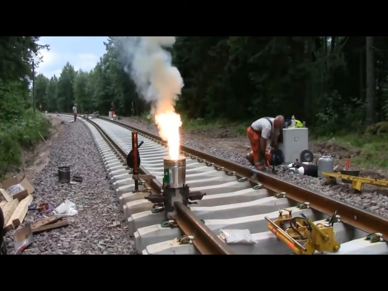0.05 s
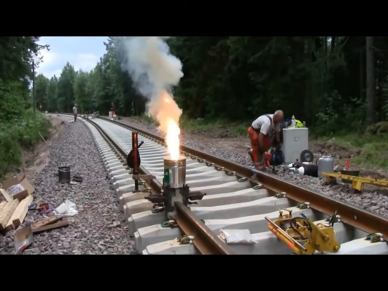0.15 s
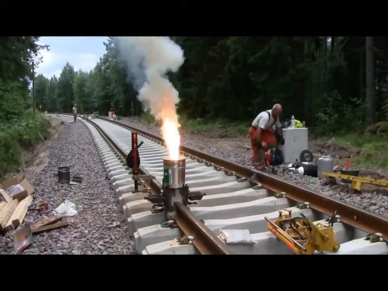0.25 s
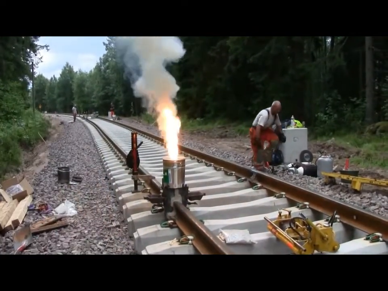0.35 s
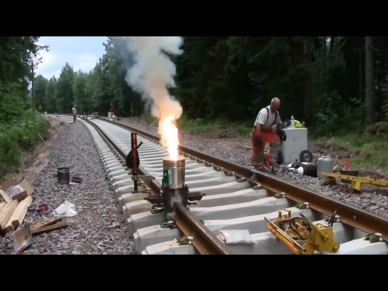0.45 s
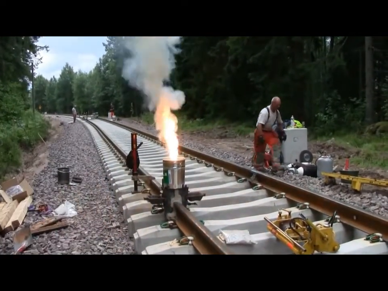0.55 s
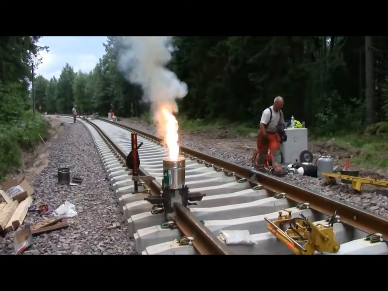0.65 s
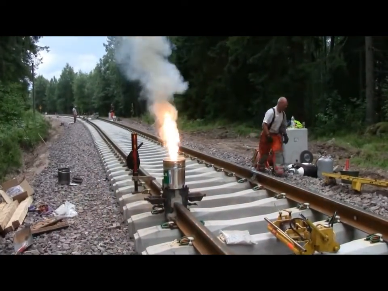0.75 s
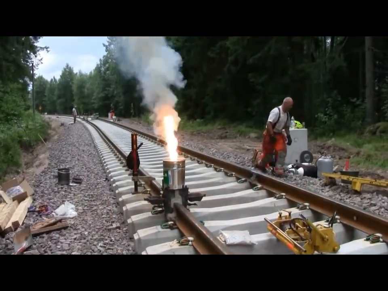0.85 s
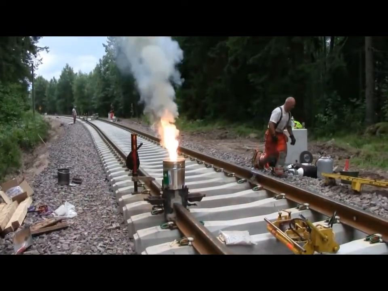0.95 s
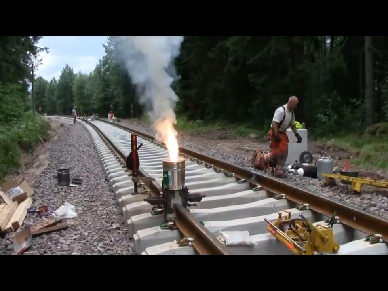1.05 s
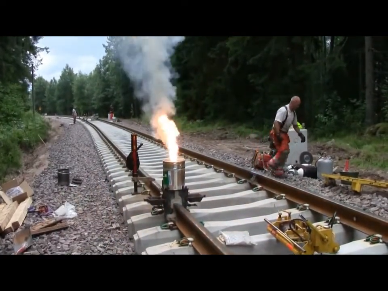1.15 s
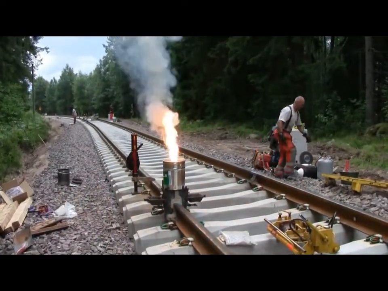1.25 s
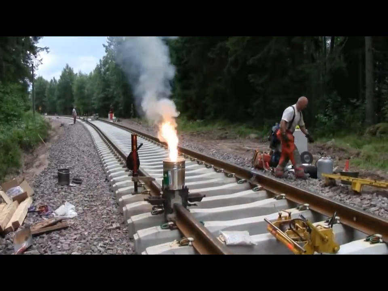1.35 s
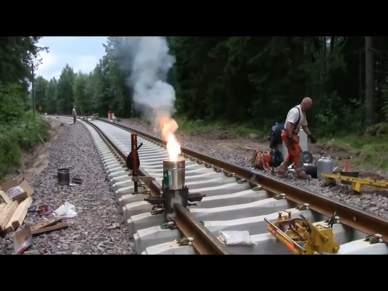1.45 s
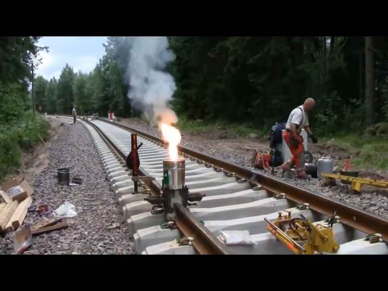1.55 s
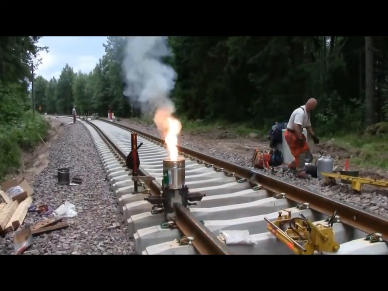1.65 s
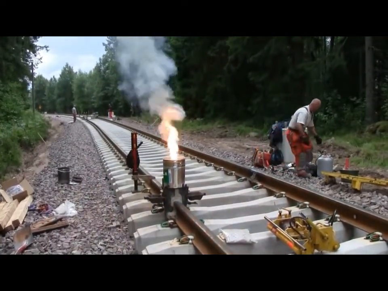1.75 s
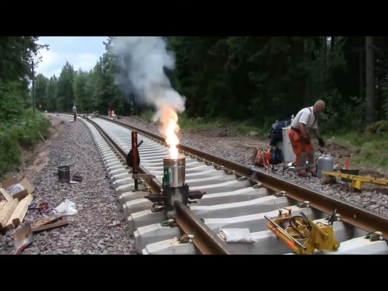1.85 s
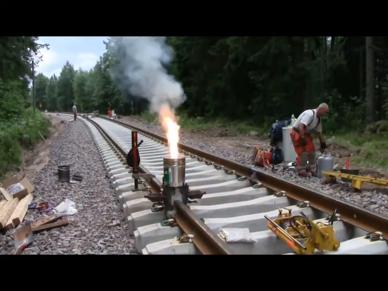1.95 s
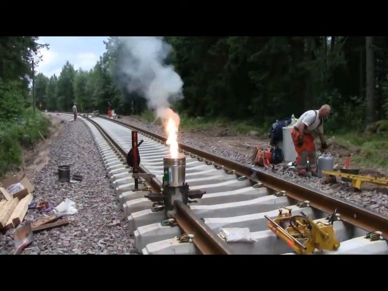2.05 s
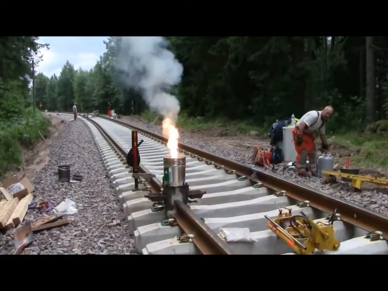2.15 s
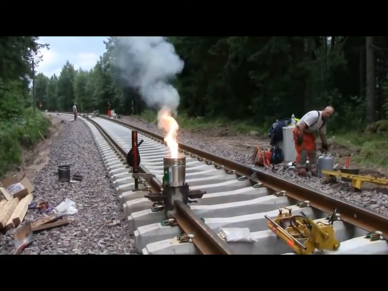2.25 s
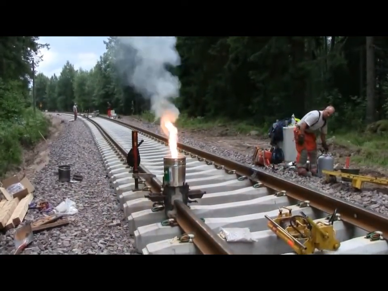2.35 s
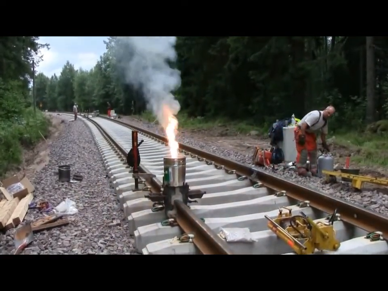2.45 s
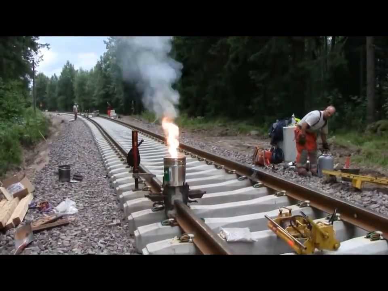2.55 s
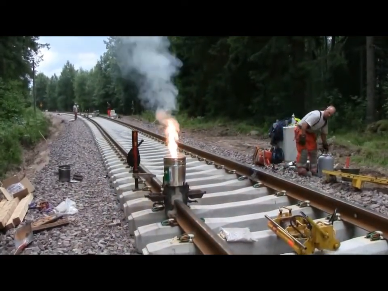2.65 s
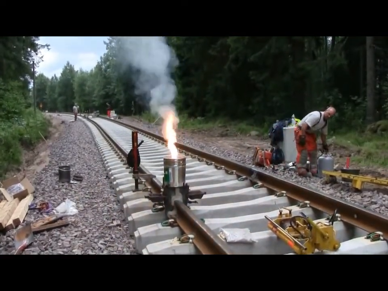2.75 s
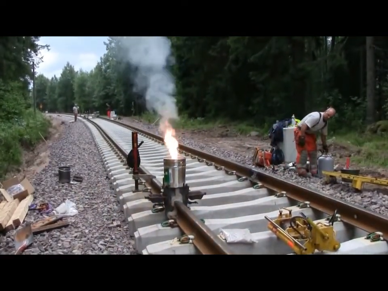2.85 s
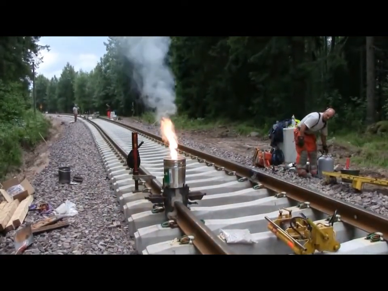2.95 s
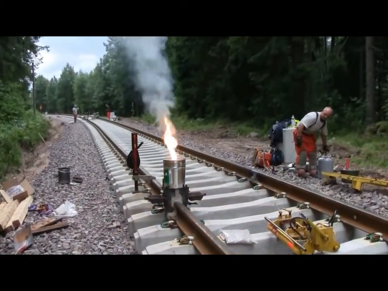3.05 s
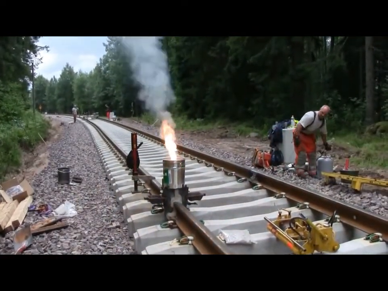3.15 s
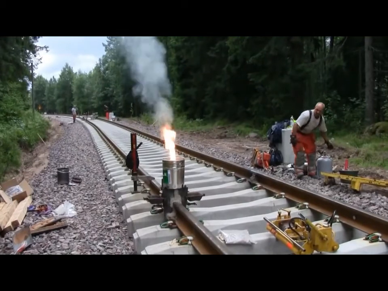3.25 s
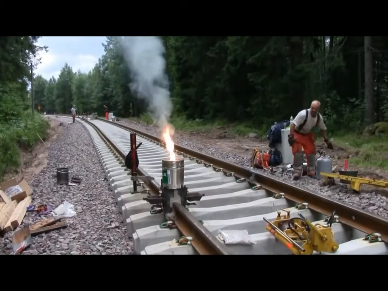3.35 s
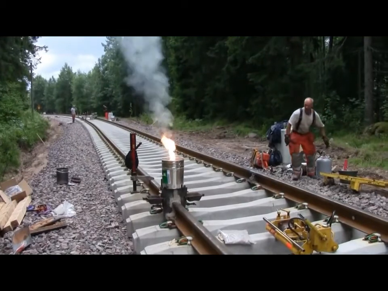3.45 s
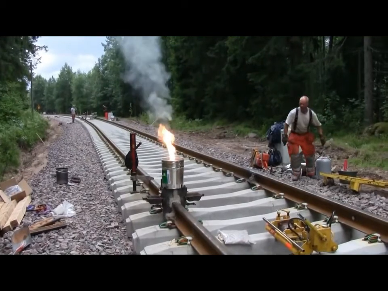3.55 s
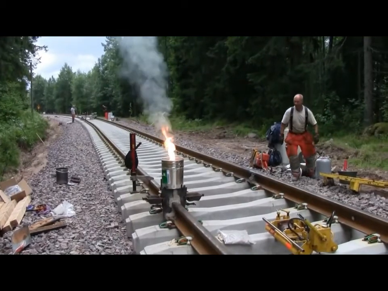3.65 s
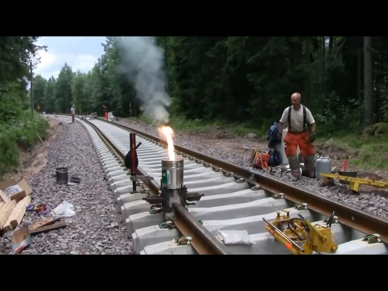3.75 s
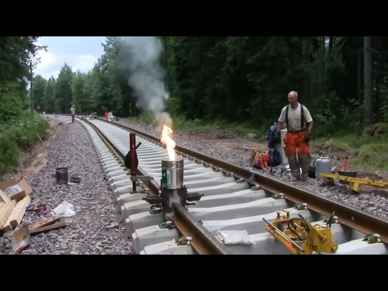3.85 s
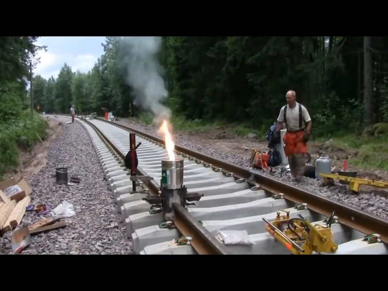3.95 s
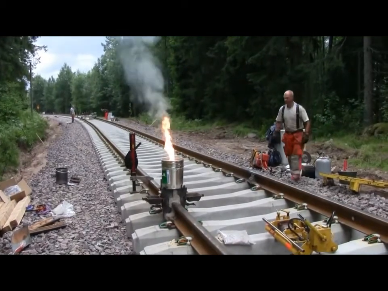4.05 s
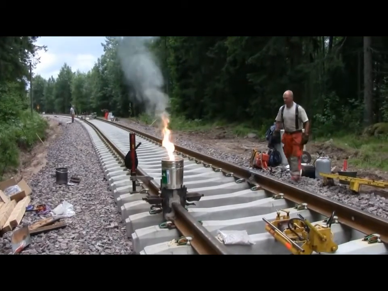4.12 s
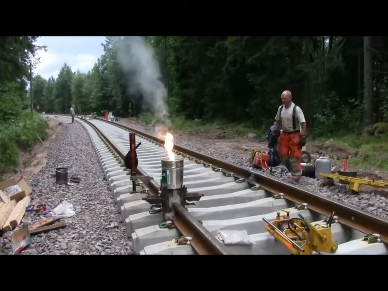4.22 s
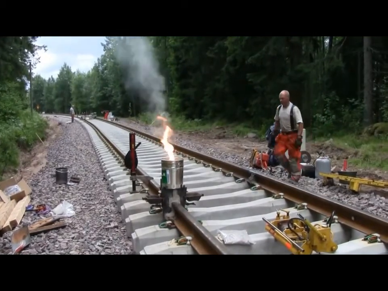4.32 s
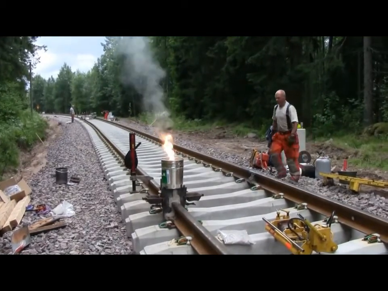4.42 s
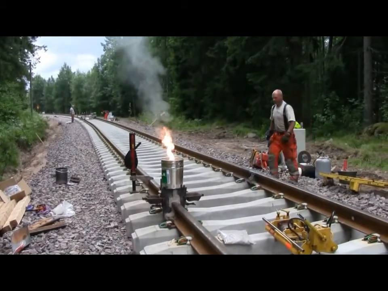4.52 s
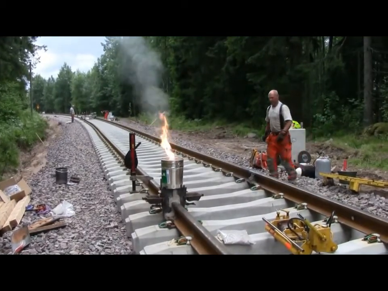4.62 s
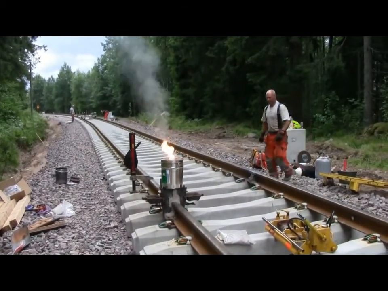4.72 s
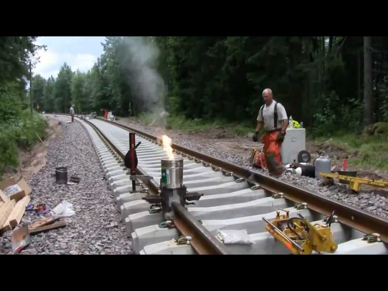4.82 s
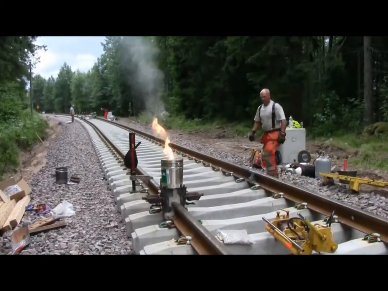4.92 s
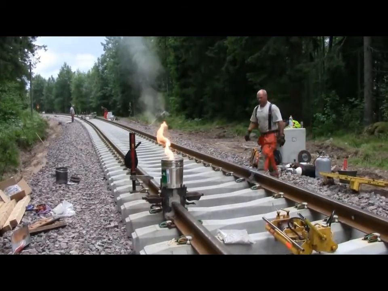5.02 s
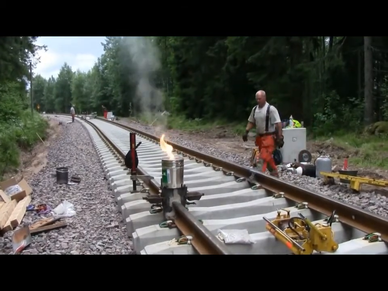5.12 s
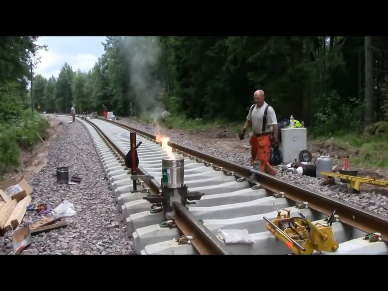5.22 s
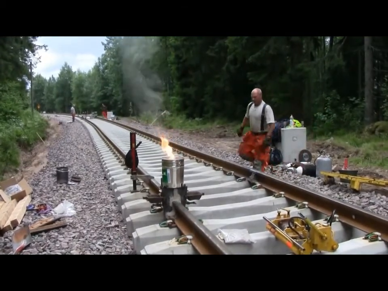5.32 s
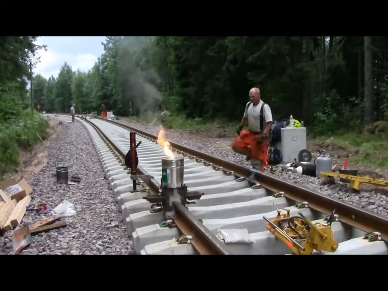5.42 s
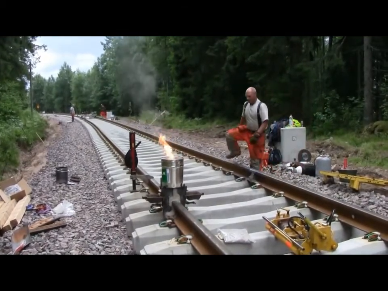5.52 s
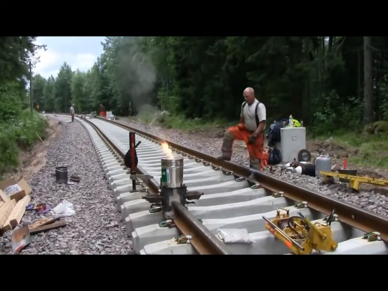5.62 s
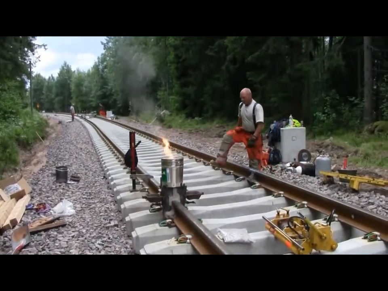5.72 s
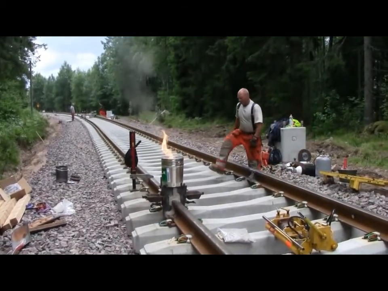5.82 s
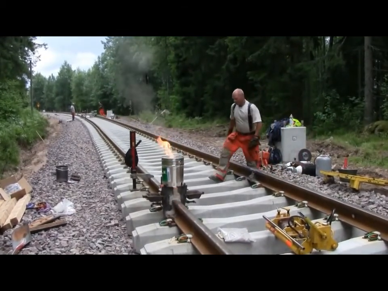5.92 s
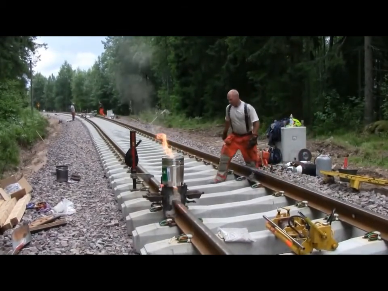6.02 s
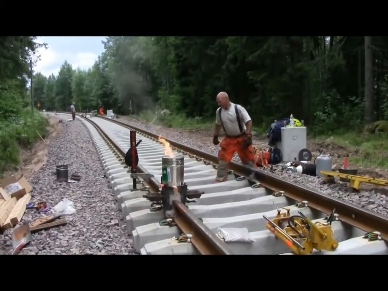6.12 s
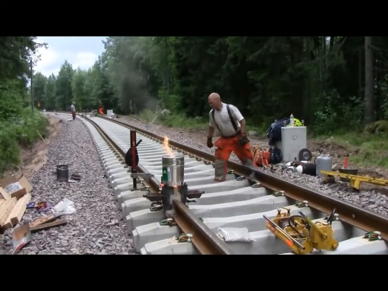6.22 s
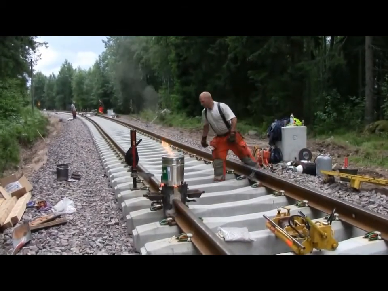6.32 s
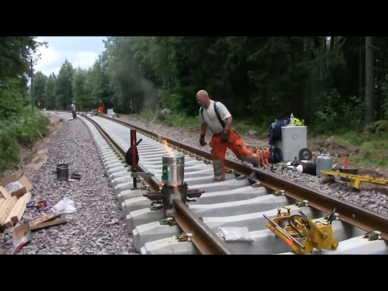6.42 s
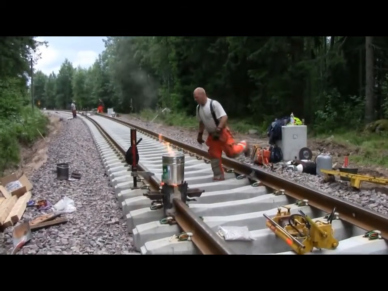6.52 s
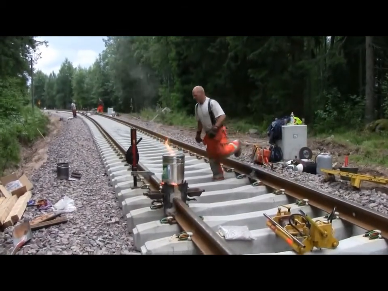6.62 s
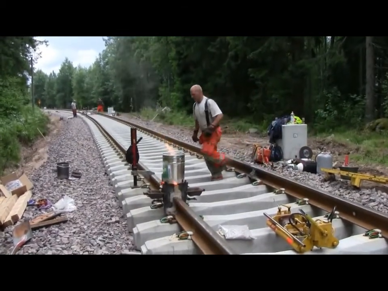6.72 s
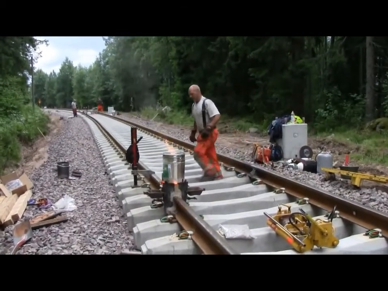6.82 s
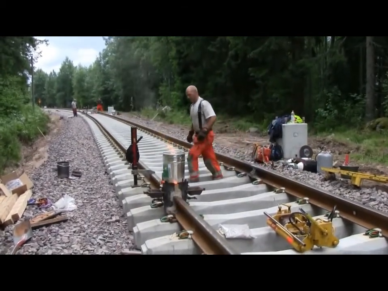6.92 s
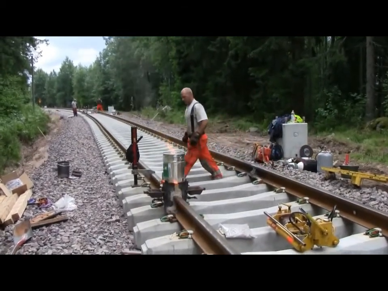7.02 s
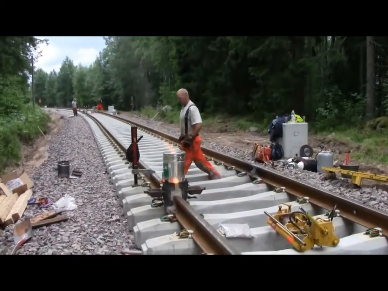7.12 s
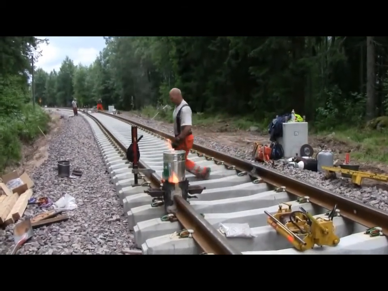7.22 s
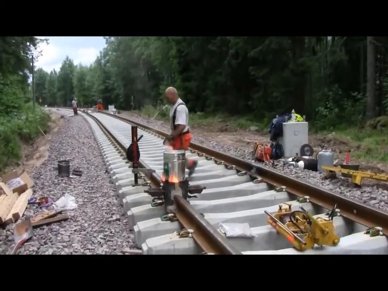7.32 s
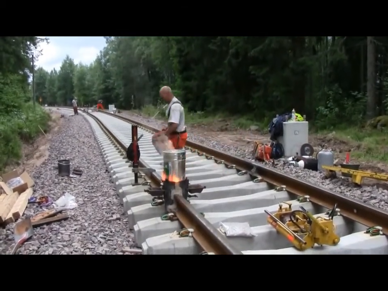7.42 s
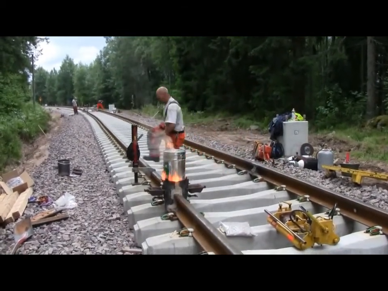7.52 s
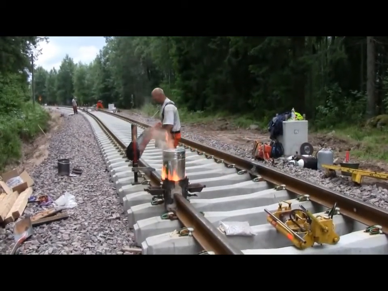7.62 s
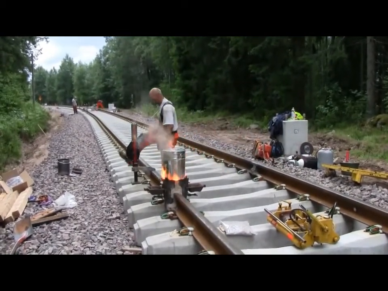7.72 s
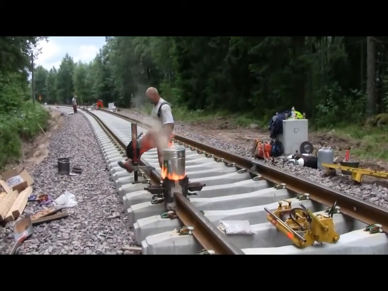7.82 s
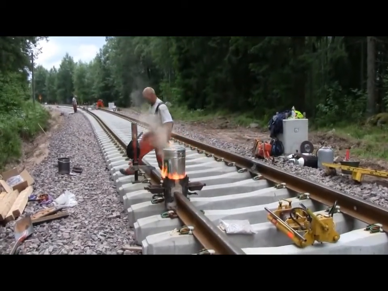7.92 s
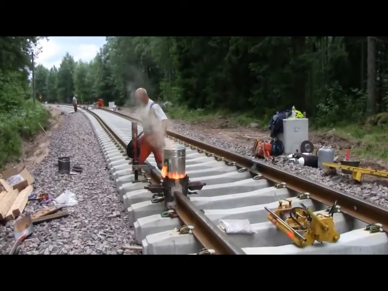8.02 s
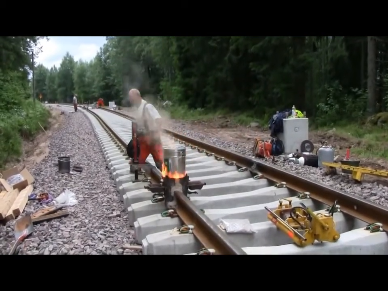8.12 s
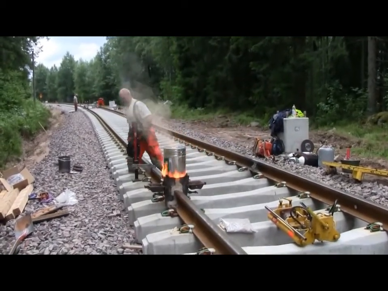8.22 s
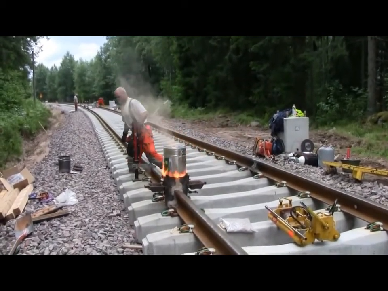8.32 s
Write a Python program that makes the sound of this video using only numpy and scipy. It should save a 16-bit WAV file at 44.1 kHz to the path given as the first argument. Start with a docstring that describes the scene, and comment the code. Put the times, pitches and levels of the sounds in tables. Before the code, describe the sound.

Outdoors among trees, a thermite crucible burns on a railway track, heard in fairly close stereo with a faint woodland echo. From 0 to 1 s it is loudest: hard slag cracks, a rough burst of hissing gas, bright spitting droplets and fizzing sparks over a hollow boom and low flame rumble. Another tight cluster of gas spurts and snaps comes around 0.8-0.9 s. From 1.1 to 3 s, rapid bubble bursts thud irregularly inside the pot, with crisp ticks and tiny metallic pings. A strong crack sounds near 3.3 s, others around 4.1-4.9 s, while the boiling weakens and the thuds deepen. After 5.3 s it is nearly spent: soft boots on gravel and sleepers, a crack near 5.8 s, sparse droplet spits and a dull knock at 7.1 s. From about 7.5 s, steel rushes softly and hollowly into the mould, gulping air at 7.6 and 8.2 s, with a last snap near 8.3 s.

```python
"""Slag cracks, gas spurts and spitting droplets over a booming pot: thermite burns on a track in a forest.
Gas bubbles drive a hollow boom, a flame rumble with fizzing sparks and a hissing leak, all by coloured noise.
Slag and droplets are ringing noise bursts; beads ping as decaying sines. The trees add a faint echo.
The boiling dies away, boots cross the track, and steel runs into the mould with a soft hollow rush."""
import sys
import numpy as np
from scipy import signal
from scipy.fft import rfft, irfft, next_fast_len
from scipy.io import wavfile
from scipy.ndimage import uniform_filter1d

SR = 44100
rng = np.random.default_rng(int(sys.argv[2]) if len(sys.argv) > 2 else 0)


def store_pcm(level_fs):
    """Save levels as 16-bit WAV."""
    pcm = np.round(np.clip(level_fs, -1, 1) * 32767).astype(np.int16)
    wavfile.write(sys.argv[1], SR, np.atleast_2d(pcm).T)


N = 369116
TIME = np.arange(N) / SR

# "nominal": trimmed or scaled where used
# vigour of the reaction, ebbing as the charge is used up: (time [s], level [dB])
VIGOUR_DB = [(0, -33.5), (1.0, -34), (1.6, -41), (2.6, -42.5), (3.2, -45.5), (4.6, -47.5), (5.3, -54.5),
             (6.1, -58), (8.37, -71)]
# big gas bubbles bursting: (time [s], nominal level [dB], nominal upper band re boom [dB], surge hold [s])
BUBBLE_BURSTS = [(0.318, -28.5, -7, 0.073), (0.436, -34, -22, 0.044), (1.103, -26, 0, .03),
                 (1.193, -25.5, -12, .03), (1.3, -26.5, -16, 0.037), (1.378, -22.5, -32, 0.14),
                 (1.484, -23, -12.5, 0.037), (1.639, -25, -13, 0.03), (1.738, -28.5, -11, 0.074),
                 (1.846, -25.5, -18, 0.071), (1.909, -23, -4.5, 0.068), (2.0, -26, -17, .07),
                 (2.106, -26.5, -26, 0.056), (2.199, -27.5, -14, .05), (2.298, -29, -17, 0.059),
                 (2.382, -29, -24, 0.041), (2.531, -36, -3.5, 0.025), (2.628, -31.5, -18, 0.14),
                 (2.75, -23.5, -12, 0.041), (2.838, -27.5, -24, 0.065), (2.884, -21, -8.5, 0.0063),
                 (2.939, -40, -20, 0.013), (3.045, -27, -11.5, 0.018), (3.181, -27.5, -12, 0.046),
                 (3.344, -31, -18, 0.061), (3.465, -32, -37, 0.02), (3.529, -27.5, -7.5, 0.06),
                 (3.619, -33, -18, 0.022), (3.754, -38, -19, 0.12), (3.916, -28, -11, 0.011),
                 (4.022, -28.5, -6.5, 0.017), (4.096, -33.5, -19, 0.028), (4.222, -26, -19, 0.0086),
                 (4.378, -30, -20, 0.025), (4.486, -29, -11, 0.017), (4.556, -35, -14, .05),
                 (4.647, -30.5, -38, 0.036), (4.727, -28, -17.5, 0.022), (4.805, -31.5, -24, 0.012),
                 (4.968, -33, -52, 0.037), (5.072, -36.5, -19, .055), (5.145, -33.5, -28, 0.0067),
                 (5.202, -34.5, -32, 0.038), (5.379, -29.5, -16, 0.0091), (5.453, -37.5, -8, 0.023),
                 (5.506, -37, -22, 0.021), (5.653, -38.5, -35, 0.036), (5.856, -34.5, -20, 0.03),
                 (5.901, -32, -13, 0.039), (6.042, -33.5, -45, 0.016), (6.174, -37.5, -24, 0.04),
                 (6.381, -39, -17, .015), (6.626, -35.5, -6.5, .02)]
# fine sparks: (time [s], nominal level [dB])
SPARK_DB = [(0.0, -42), (0.58, -53.5), (1.0, -50.5), (1.17, -58.5), (1.84, -55.5), (2.17, -55.5),
            (3.31, -60), (3.47, -51), (3.78, -56), (4.41, -51), (5.13, -63.5), (6.13, -55), (6.81, -61.5),
            (7.37, -57), (8.04, -61), (8.37, -54)]
# spurts of gas from the lid: (peak time [s], nominal level [dB], half length [s])
GAS_SPURTS = [(0.04, -26.5, 0.024), (0.045, -38.5, 0.22), (0.065, -32, 0.017), (0.768, -36.5, 0.015),
              (0.817, -25, 0.012), (0.842, -23, 0.021), (0.886, -29, 0.023), (.93, -52, 0.16),
              (1.089, -38.5, 0.01), (1.152, -33.5, 0.0037), (1.174, -36, 0.015), (1.224, -34.5, 0.0023),
              (1.369, -33, 0.0093), (1.409, -37, 0.024), (1.462, -43, 0.011), (1.558, -49.5, 0.054),
              (1.735, -47.5, 0.029), (1.899, -52.5, 0.006), (2.003, -59.5, 0.015), (2.536, -43.5, 0.0032),
              (3.206, -46.5, 0.005), (3.598, -48.5, 0.039), (3.725, -42, 0.0079), (3.898, -44.5, 0.015),
              (4.395, -43, 0.0071), (4.978, -51, 0.021)]
# slag cracks and one sharp spit (0.7904 s):
# (time [s], nominal level [dB], ring [Hz], nominal treble re whole [dB], scatter t60 [s])
SHARP_SNAPS = [(0.0302, -10.5, 1690, -64, 0.041), (0.138, -15.5, 5750, -11.5, 0.084),
               (0.268, -11.5, 1300, -11.5, 0.078), (0.7904, -14.5, 1700, -18.5, 0.041),
               (0.8631, -7, 2260, -51, 0.035), (2.9204, -19, 5360, -10, 0.063),
               (3.3118, -9, 4760, -17.5, 0.043), (4.0565, -14, 2450, -21.5, 0.07),
               (4.1674, -20.5, 4000, -22, 0.053), (4.4766, -21.5, 2460, -24, 0.049),
               (4.7008, -14.5, 1800, -10.5, 0.062), (4.8617, -26.5, 4500, -13, 0.044),
               (5.2507, -30.5, 1800, -5, 0.093), (5.8276, -16.5, 6040, -17.5, 0.049),
               (8.282, -22.5, 3850, -7, 0.058)]
# large droplets landing:
# (time [s], nominal level [dB], ring [Hz], nominal treble re whole [dB], nominal body re whole [dB])
DROPLET_SPITS = [(0.0427, -18, 3360, -12, -23), (0.095, -23.5, 4300, -19, -21),
                 (0.1557, -19, 5530, -13, -4), (0.2433, -21, 5340, -13, -1), (0.4235, -16, 5460, -29, -7.5),
                 (0.5353, -14, 6050, -4, 13.5), (0.604, -11, 7350, -16.5, -11.5),
                 (0.622, -20.5, 6690, -11, -3), (0.6399, -17, 4060, -14, -23),
                 (0.9174, -18, 4200, -25, -21), (0.944, -19.5, 6420, -13, -17),
                 (1.026, -16, 6200, -10.5, 0), (1.0449, -20.5, 5600, -16, -24), (1.06, -19, 4200, -14, -13),
                 (1.123, -26, 6600, -12, -15), (1.234, -25, 9900, -23, -44), (1.4046, -17, 8700, -17, -47),
                 (1.4987, -22.5, 9150, -11, -29), (1.524, -19, 6800, -7, -18), (1.575, -22, 6900, -21, -18),
                 (1.588, -25, 7170, -26, -26), (1.839, -24.5, 5900, -11, -39),
                 (1.9467, -26.5, 5040, -4, -4), (2.1208, -28.5, 5400, -9, -5),
                 (2.2862, -14.5, 5930, -19, -39), (2.38, -29.5, 3400, 13, -23),
                 (2.442, -19, 6100, -11, -31), (2.6865, -28, 8900, -12, -15), (2.89, -27, 5950, -16, -11),
                 (3.1, -28.5, 9150, -14, -24), (3.2017, -31, 5000, 4, -9), (3.441, -24.5, 7900, -16, -31),
                 (3.5423, -22.5, 6700, -17.5, -15), (3.876, -30, 5130, -10, -4),
                 (3.9002, -27.5, 6050, -9, -5), (4.235, -33, 6100, -16, -13), (4.282, -31, 5950, -15, -22),
                 (4.3309, -21.5, 6160, -14.5, -6), (4.502, -25.5, 6600, -10, -14),
                 (4.611, -27.5, 3880, -21, -28), (4.715, -23, 3800, 1, -14), (4.812, -35, 6250, 2, -21),
                 (4.9028, -28, 5240, -1.5, 13), (5.3753, -32.5, 5940, -11, 1),
                 (5.5453, -30.5, 4130, -16, -14), (5.6403, -25, 4300, -17.5, -21),
                 (5.9516, -30.5, 9600, -11, -18), (6.2657, -29.5, 4400, -16, -20),
                 (6.2904, -32, 6640, -10, -9), (6.336, -32.5, 5360, -11, 0),
                 (6.3564, -28.5, 3430, -20.5, -19), (6.6074, -33, 9500, -21, -16),
                 (6.747, -20.5, 5400, -21, -26), (6.831, -34, 9400, -10, -31),
                 (7.1647, -19.5, 5080, -17, -31), (7.4645, -19, 7940, -7, -25),
                 (7.5916, -34.5, 8840, -23, -31), (8.0365, -32, 5640, -6, -27)]
# beads of slag on steel: (time [s], level [dB], mode [Hz], t60 [s])
BEAD_PINGS = [(.14, -53, 9000, 0.81), (.943, -27, 6410, 0.044), (.946, -41.5, 8900, 0.46),
              (1.125, -35, 6730, 0.069), (2.565, -48.5, 7240, 0.14), (5.55, -54, 9100, 0.66),
              (7.59, -49, 9100, 0.32), (7.87, -60, 9040, .25)]
# steel running into the mould: (time [s], level [dB])
POUR_DB = [(0, -60), (5.0, -62), (5.7, -57), (6.4, -57), (7.0, -56), (7.6, -52), (8.37, -50.5)]
# steel gulping air in the mould: (time [s], level [dB], centre [Hz])
AIR_GULPS = [(7.616, -44.5, 615), (8.195, -40, 645)]
# boots on ballast and sleepers, and one short dull knock (7.126 s):
# (time [s], nominal level [dB], decay [s], nominal gravel re thud [dB])
STEPS_AND_KNOCK = [(5.453, -41.5, 0.039, -2), (5.522, -44, 0.027, 20), (6.341, -41.5, 0.019, -10),
                   (6.467, -40, 0.093, -6), (6.623, -51, 0.051, 5), (7.126, -44.5, 0.0086, -31),
                   (7.39, -39, 0.062, -2.5)]

# boom of the pot: (frequency [Hz], relative density [dB])
POT_SPECTRUM = [(60, -32.5), (150, -18.5), (218, -18.5), (238, -5.5), (258, 3), (282, -4.5), (312, -0.5),
                (360, -4), (420, -13), (620, -13.5), (800, -19), (1200, -27), (2500, -50), (6000, -90)]
# flame rumble: (frequency [Hz], relative density [dB])
FLAME_SPECTRUM = [(20, -23), (45, -10), (68, -7.5), (115, 1.5), (190, 0.5), (225, -9.5), (500, -39),
                  (1500, -65)]
# fizz of the sparks: (frequency [Hz], relative density [dB])
FIZZ_SPECTRUM = [(500, -50), (2500, -5), (4500, 1), (6300, 5.5), (7600, -12.5), (9200, -4), (12000, -6),
                 (14500, -10), (16000, 8.5)]
# gas under the lid: (frequency [Hz], relative density [dB])
GAS_SPECTRUM = [(200, -22), (500, 2), (800, 0), (1100, 4.5), (1600, 2.5), (2800, 2.5), (4000, -3),
                (6000, -12), (9000, -21), (16000, -27)]
# sharp snaps: (frequency [Hz], relative density [dB])
SNAP_SPECTRUM = [(100, -13), (500, -3), (950, -5.5), (1600, 0.5), (3000, 0), (5500, 1), (8000, -3.5),
                 (12000, -11), (15000, -8.5)]
# bursting droplet: (frequency [Hz], relative density [dB])
DROPLET_SPECTRUM = [(300, -8), (1200, -13.5), (3000, -7.5), (5500, 1.5), (7500, 2), (9500, 1.5),
                    (12500, 0.5), (15000, 1.5)]
# hollow of the mould: (frequency [Hz], relative density [dB])
MOULD_SPECTRUM = [(80, -13), (200, -2.5), (330, 0), (470, -1), (610, 5), (760, -0.5), (900, 3.5), (1080, 2),
                  (1270, -7.5), (1600, -7.5), (2200, -11), (5000, -35)]
# narrow rings of the steel shell and lid: (mode [Hz], nominal lift [dB])
SHELL_MODES = [(1433, 4), (1483, 7), (1633, 5), (1677, 6), (1975, 5), (2116, 4), (2270, 5), (2716, 5),
               (2992, 6)]
# likeness of left and right: (frequency [Hz], correlation [0-1])
STEREO_LIKENESS = [(30, .95), (80, .997), (300, .998), (1000, .985), (2000, .92), (4000, .77), (8000, .3),
                   (15000, .55)]
# echo of the trees: (frequency [Hz], t60 [s])
FOREST_T60 = [(100, 0.093), (1000, 0.96), (4000, 0.33), (15000, 0.46)]

# gas surge behind each big bubble, re its nominal level
SURGE_DB, SURGE_ATTACK_S, SURGE_RELEASE_S = -13, 0.022, 0.008
# flame: level re initial flow, lag behind the flow, start and end of shrinking, share of the flow's dB
FLAME_DB, FLAME_LAG_S, SHRINK_S, FLAME_FOLLOW = -14, 0.01, [3.4, 5.2], 0.54
FIZZ_DB, SMALL_DROPS_DB = 4.5, 3.5  # re SPARK_DB
LEAK_DB, HISS_DB = -15.5, -63.5  # leak re gas flow; constant hiss
THUD_HZ, THUD_DB_PER_S = 197, 1.3  # as the melt sinks, bubbles thud deeper in the emptying pot
EDGE_HZ = 15850


def amp(db):
    """Decibels to gain."""
    return 10 ** (np.asarray(db) / 20)


def unit(x):
    """Scales to rms 1."""
    return x / np.sqrt(np.mean(x ** 2) + 1e-20)


def crest(x):
    """Scales so that the loudest 3 ms have rms 1."""
    power = uniform_filter1d(np.atleast_2d(x ** 2).mean(0), size=132, mode="constant")
    return x / np.sqrt(power.max() + 1e-20)


def read(points, hz):
    """Interpolates a table on a log-frequency axis."""
    f, value = np.transpose(points)
    return np.interp(np.log(hz + 1), np.log(f + 1), value)


def level(rows):
    """A dB curve as a gain for every sample."""
    rows = np.array(rows)
    return amp(np.interp(TIME, rows[:, 0], rows[:, 1]))


def add(mix, start_s, sound):
    """Mixes a sound in at start_s."""
    part = mix[:, max(round(start_s * SR), 0):][:, :sound.shape[-1]]
    part += sound[..., :part.shape[1]]


def colour(x, db_at, size=4096):
    """Causal minimum-phase filter with gain db_at(Hz): rings after a click, never before."""
    log_gain = np.log(amp(db_at(abs(np.fft.fftfreq(size, 1 / SR)))))
    response = np.exp(np.conj(signal.hilbert(log_gain)))
    taps = np.fft.ifft(response).real[:size // 2]
    return signal.fftconvolve(np.atleast_2d(x), taps[None], axes=1)[:, :x.shape[-1]]


def spread(pair):
    """Makes two unrelated signals alike in the bass and less so in the treble."""
    n = pair.shape[1]
    size = next_fast_len(n)
    same = np.clip(read(STEREO_LIKENESS, np.fft.rfftfreq(size, 1 / SR)), 0, 1)
    mid, side = rfft(pair, size) * np.sqrt([(1 + same) / 2, (1 - same) / 2])
    return irfft([mid + side, mid - side], size)[:, :n]


def flutter(n, rate_hz):
    """Random curve: normal knots, rate_hz a second, joined by straight lines."""
    knots = rng.standard_normal(n // 16 + 2)
    return np.interp(np.arange(n) * rate_hz / SR, np.arange(len(knots)), knots)


def bump(hz, centre_hz, octaves):
    """A bell of height 1 on a log-frequency axis."""
    return 1 / (1 + (np.log2((hz + 1) / centre_hz) / octaves) ** 2)


def treble(hz):
    """A shelf that rises from 0 to 1 through the top octaves."""
    return 1 / (1 + (7500 / (hz + 1)) ** 4)


def above_boom(hz):
    """Weight of everything above the boom of the pot, to the top."""
    return bump(hz, 560, 6.9) / (1 + (480 / (hz + 1)) ** 6)


def shell(hz, width_hz=11):
    """dB by which the shell of the crucible lifts what passes through it."""
    return sum(db / (1 + ((hz - mode_hz) / width_hz) ** 2) for mode_hz, db in SHELL_MODES)


def patter(per_s, size_db):
    """Random clicks of uneven size; positive size_db makes a few large, negative a few faint."""
    size = amp(size_db * np.minimum(rng.exponential(1, N), 3.5))
    return (rng.random(N) < per_s / SR) * size * rng.standard_normal((2, N))


def patchy(x, depth_db, size):
    """Gives bursts their own pitch: random patches, size bins of 172 Hz high and some 10 ms long."""
    z = signal.stft(x, SR, nperseg=256)[2]
    patches = rng.standard_normal(z.shape[:0:-1]).T
    for _ in range(2):
        patches = uniform_filter1d(patches, size=size, axis=0)
        patches = uniform_filter1d(patches, size=3, axis=1)
    gain = amp(depth_db * np.clip(unit(patches), -2, 2))
    return unit(signal.istft(z * gain, SR, nperseg=256)[1][:, :N])


def rush(spectrum, rough_db, rate_hz):
    """Turbulent noise that comes in short puffs."""
    puffs = rng.standard_normal((2, N)) * amp(rough_db * flutter(N, rate_hz))
    return unit(colour(spread(puffs), lambda hz: read(spectrum, hz)))


def gas_flow():
    """Steady reaction flow plus, in power, the surge behind each big bubble; a gain per sample."""
    power, t = level(VIGOUR_DB)[None] ** 2, np.arange(SR // 3) / SR
    for start_s, db, _, hold_s in BUBBLE_BURSTS:
        rise = 1 - np.exp(-t / SURGE_ATTACK_S)
        release = np.exp(-np.maximum(t - hold_s, 0) / SURGE_RELEASE_S)
        add(power, start_s, (amp(db + SURGE_DB) * rise * release) ** 2)
    return np.sqrt(power[0])


def boiling(flow, per_s=260, size_db=4, sharp_per_s=55):
    """Many soft bubbles keep the hollow of the pot booming; a few burst sharply."""
    soft = colour(patter(per_s, size_db)[0], lambda hz: read(POT_SPECTRUM, hz) - 5 * above_boom(hz))
    sharp = colour(patter(sharp_per_s, size_db / 2)[0],
                   lambda hz: read(POT_SPECTRUM, hz) + 6 * above_boom(hz))
    boom = unit(soft) + amp(-6.5) * unit(sharp)
    # the gas flow is shared among the bubbles: level evened over 0.1 s
    steady = np.sqrt(abs(uniform_filter1d(boom ** 2, size=4400)) + 1e-12)
    return flow * boom / steady


def bubbles(size=4096):
    """A big bubble is one pressure pulse into the pot, then a short splutter."""
    out, t = np.zeros((2, N)), np.arange(size) / SR
    for start_s, db, sharp_db, _ in BUBBLE_BURSTS:
        push = 0.046 * rng.standard_normal(size) * np.exp(-t / 0.022)
        push[0] += 1
        edge = lambda hz: 1.8 * (sharp_db + 10.5) * above_boom(hz)
        thud = lambda hz: THUD_DB_PER_S * start_s * bump(hz, THUD_HZ, 0.35)
        boom = colour(push, lambda hz: read(POT_SPECTRUM, hz) + edge(hz) + thud(hz))
        add(out, start_s + 0.00091, amp(db - 3.5) * crest(boom))
    return out


def flame(flow):
    """The gas-fed plume rumbles, deepest while tall; fine sparks fizz in it in clusters."""
    tall = np.interp(TIME, SHRINK_S, [1, .15])  # share of the full plume
    roar = rush(FLAME_SPECTRUM, rough_db=1.0, rate_hz=32)
    small = colour(roar, lambda hz: 3 - 14 / (1 + (hz / 120) ** 4))
    keep = np.exp(-1 / (FLAME_LAG_S * SR))
    fed = signal.lfilter([1 - keep], [1, -keep], flow - flow[0]) + flow[0]
    strength = amp(FLAME_DB) * flow[0] * (fed / flow[0]) ** FLAME_FOLLOW
    rumble = strength * (tall * roar + (1 - tall) * small)
    sparks = spread(patter(per_s=12000, size_db=-3.0)) * amp(2.3 * flutter(N, 35))
    fizz = unit(colour(patchy(sparks, depth_db=-1.0, size=8), lambda hz: read(FIZZ_SPECTRUM, hz)))
    return rumble + amp(FIZZ_DB) * level(SPARK_DB) * fizz


def jet(flow):
    """Gas forces its way out under the lid as a sputter of tiny shocks."""
    power = (amp(LEAK_DB) * flow) ** 2 + amp(HISS_DB) ** 2
    for peak_s, db, half_s in GAS_SPURTS:
        power = power + amp(db + 1.0) ** 2 / (1 + ((TIME - peak_s) / half_s) ** 2 / 2) ** 4
    shocks = spread(patter(per_s=8000, size_db=1.5)) * amp(3.6 * flutter(N, 200))
    sputter = patchy(shocks, depth_db=3.0, size=4)
    voice = lambda hz: read(GAS_SPECTRUM, hz) + shell(hz)
    strength = np.sqrt(np.mean(colour(sputter, voice) ** 2))
    return colour(sputter * np.sqrt(power), voice) / strength


def snaps(size=6144):
    """Slag cracks and a spit: one shock, a quick rattle in the lid, weak scatter from mould and stones."""
    out, t = np.zeros((2, N)), np.arange(size) / SR
    for start_s, db, ring_hz, treble_db, t60_s in SHARP_SNAPS:
        scatter = 0.16 * amp(-60 * t / max(t60_s, .005))
        rattle = 0.085 * np.exp(-t / 0.0012)
        snap = (scatter + rattle) * rng.standard_normal((2, size))
        snap[0, 0] += 1.2
        ring = lambda hz: shell(hz, width_hz=83) / 4 + 7 * bump(hz, ring_hz, 0.37)
        tilt = lambda hz: 1.13 * (treble_db + 16) * treble(hz)
        voiced = colour(spread(snap), lambda hz: read(SNAP_SPECTRUM, hz) + ring(hz) + tilt(hz))
        add(out, start_s + .0004, amp(db - 7.5) * crest(voiced))
    return out


def spit(ring_hz, treble_db, body_db, sizzle_s, size=3072):
    """A hot droplet bursts in a ragged, ringing puff of steam; the ground returns it a moment later."""
    t = np.arange(size) / SR
    shape = (1 - np.exp(-t / 0.001)) * (np.exp(-t / sizzle_s) + 0.59 * np.exp(-t / 0.012))
    puff = rng.standard_normal((2, size)) * shape * amp(1.8 * flutter(size, 527))
    add(puff, rng.uniform(.0004, 0.0014), 0.38 * puff)
    ring = lambda hz: 8 * bump(hz, ring_hz, 0.11) + 5 * bump(hz, ring_hz, 0.025)
    top = lambda hz: 1.38 * (treble_db + 9.5) * treble(hz)
    body = lambda hz: 0.81 * (body_db + 17.5) / (1 + (hz / 4000) ** 6)
    voice = lambda hz: read(DROPLET_SPECTRUM, hz) + ring(hz) + top(hz) + body(hz)
    return crest(colour(spread(puff), voice, size=512))


def spatter(count=240, sizzle_s=0.0066):
    """Large droplets, and evenly scattered small ones whose level follows the sparks."""
    out, sparks = np.zeros((2, N)), level(SPARK_DB)
    for start_s, db, *kind in DROPLET_SPITS:
        add(out, start_s, amp(db - 9) * spit(*kind, sizzle_s))
    for k, (when, weight, pitch, wet) in enumerate(rng.random((count, 4))):
        at = int((k + when) / count * (N - 1))
        gain = sparks[at] * amp(SMALL_DROPS_DB + 10 * weight ** 2)
        drop = spit(3800 * 2.6 ** pitch, -6.5, -1.3, sizzle_s * (0.15 + wet))
        add(out, at / SR, gain * drop)
    return out


def pings():
    """Hard beads rattle on steel and ring one high mode of it."""
    out, t = np.zeros((2, N)), np.arange(SR // 2) / SR
    for start_s, db, mode_hz, t60_s in BEAD_PINGS:
        phase = 2 * np.pi * (mode_hz * t + rng.random((2, 1)) / 4)
        decay = amp(db - 60 * t / t60_s + 3.4 * flutter(len(t), 320))
        add(out, start_s, decay * np.sin(phase + 0.44 * flutter(len(t), 220)))
    return out


def pour(size=4096):
    """The falling steel churns in the hollow mould and now and then gulps air."""
    out = level(POUR_DB) * rush(MOULD_SPECTRUM, rough_db=1.5, rate_hz=90)
    t = np.arange(size) / SR
    for start_s, db, centre_hz in AIR_GULPS:
        churn = spread(rng.standard_normal((2, size))) * t * np.exp(-t / 0.0039)
        gulp = colour(churn, lambda hz: 36 * bump(hz, centre_hz, 0.8))
        add(out, start_s, amp(db) * crest(gulp))
    return out


def steps_and_knock(size=16384):
    """A boot thuds down and loose stones grind under it; the knock is nearly all thud."""
    out, t = np.zeros((2, N)), np.arange(size) / SR
    for start_s, db, decay_s, gravel_db in STEPS_AND_KNOCK:
        weight = (1 - np.exp(-t / 0.00079)) * np.exp(-t / max(decay_s, .005))
        grind = spread(rng.standard_normal((2, size))) * weight * amp(7.0 * flutter(size, 211))
        thud = lambda hz: bump(hz, 404, 1) ** 2
        gravel = lambda hz: amp(gravel_db - 5.0) * bump(hz, 1630, 1.5) ** 2
        contact = colour(grind, lambda hz: 20 * np.log10(1e-4 + thud(hz) + gravel(hz)))
        add(out, start_s, amp(db - 0.5) * crest(contact))
    return out


def forest(x, size=32768):
    """Diffuse echo from the trunks on both sides: noise decaying at its own t60 in each band."""
    hz, t, z = signal.stft(rng.standard_normal((2, size)), SR, nperseg=256)
    z = z * amp(-60 * t / read(FOREST_T60, hz)[:, None]) * (1 - np.exp(-t / 0.0043))
    tail = signal.istft(z, SR, nperseg=256)[1]
    return signal.fftconvolve(x, tail / np.linalg.norm(tail[0]), axes=1)[:, :N]


def air():
    """The faint low rumble of the open air."""
    spectrum = [(20, 2), (45, -1), (110, -7.5), (190, -8), (350, -22), (1200, -16)]  # (Hz, relative dB)
    return amp(-63.0) * rush(spectrum, rough_db=3, rate_hz=4.1)


def scene():
    """Crucible ahead, trees around; one gas flow drives the boiling, the flame and the leak."""
    flow = gas_flow()
    burn = boiling(flow) + bubbles() + flame(flow) + pour() + steps_and_knock()
    sharp = jet(flow) + snaps() + spatter() + pings()
    return burn + sharp + air() + forest(amp(-15.0) * sharp + amp(-13) * burn)


def record(dry):
    """Microphones shed deep bass, differ a little at the top and round off peaks; then the band limit."""
    hz = np.fft.rfftfreq(N, 1 / SR)
    tilt_db = np.array([[1], [-1]]) * (2.6 * bump(hz, 14000, .25) - 1.2 * bump(hz, 8000, .4))
    heard = irfft(rfft(dry) * amp(tilt_db), N)
    heard = signal.sosfilt(signal.butter(4, 57, "high", fs=SR, output="sos"), heard)
    heard = .6 * np.tanh(heard / .6)
    low_pass = signal.firwin(401, EDGE_HZ, window=("kaiser", 8), fs=SR)
    return signal.oaconvolve(heard, low_pass[None], "same")


dry = scene()
out = record(dry)
store_pcm(out)
```